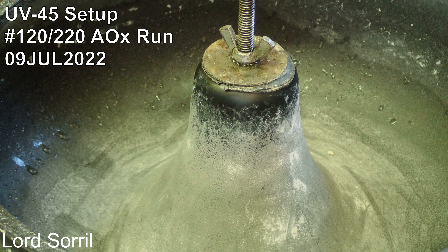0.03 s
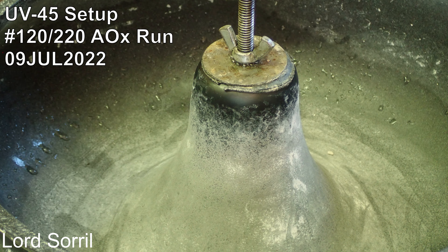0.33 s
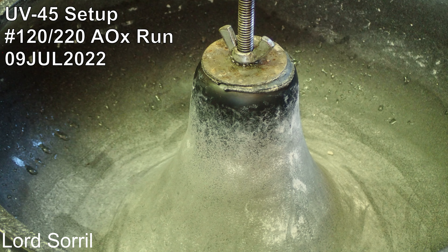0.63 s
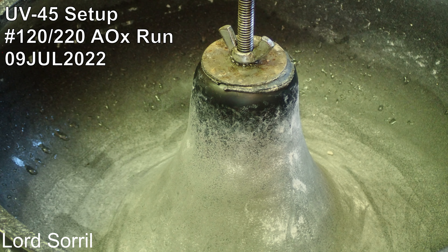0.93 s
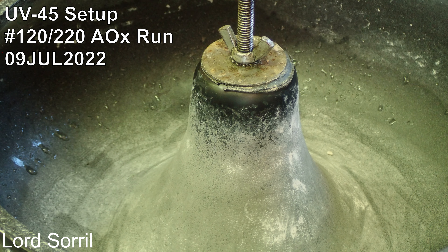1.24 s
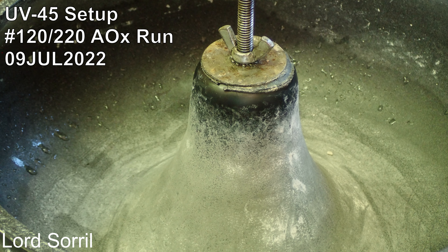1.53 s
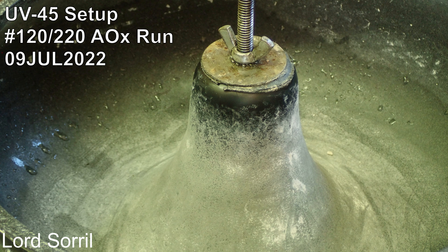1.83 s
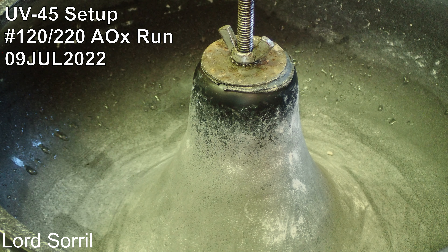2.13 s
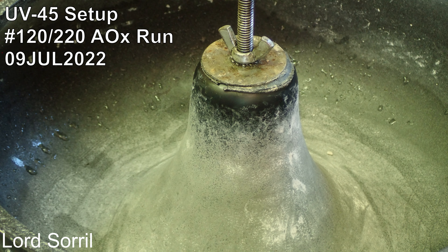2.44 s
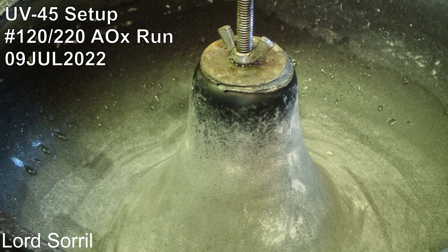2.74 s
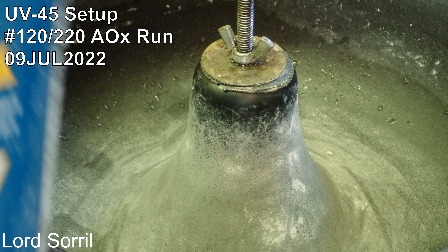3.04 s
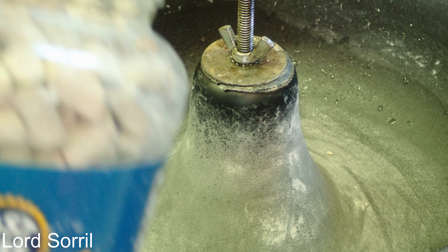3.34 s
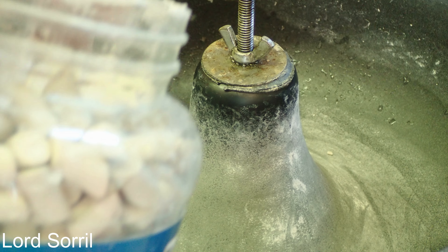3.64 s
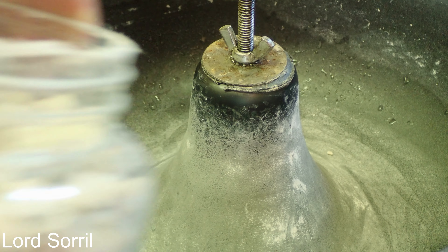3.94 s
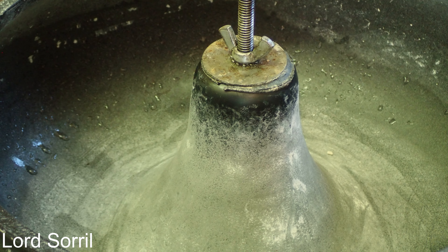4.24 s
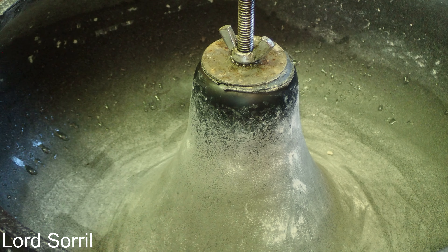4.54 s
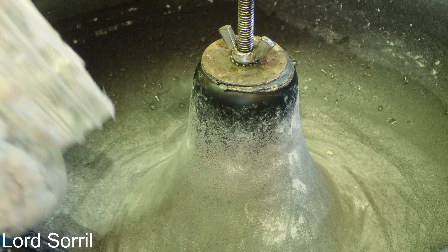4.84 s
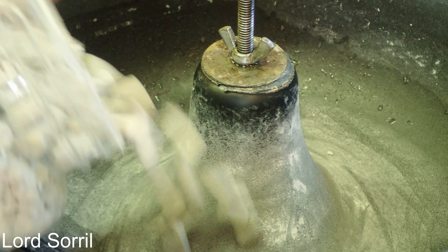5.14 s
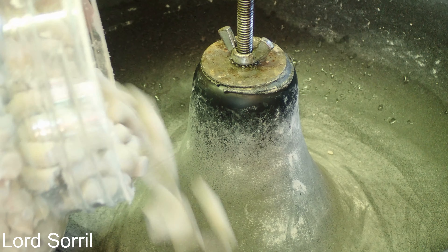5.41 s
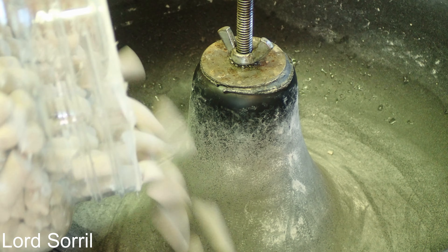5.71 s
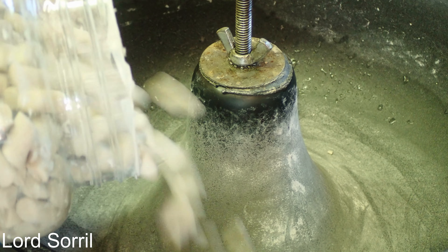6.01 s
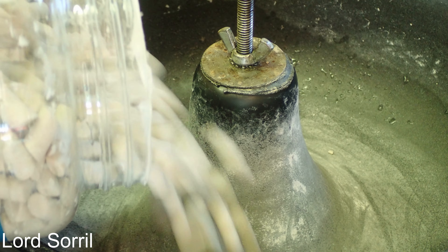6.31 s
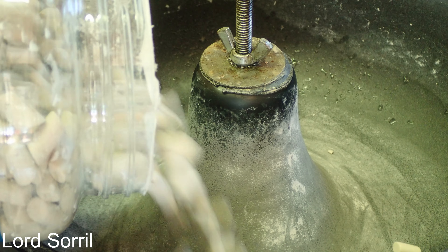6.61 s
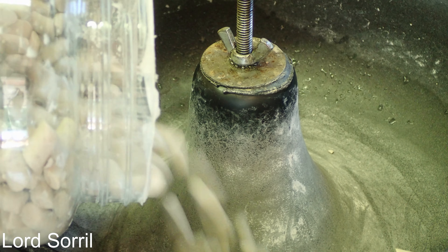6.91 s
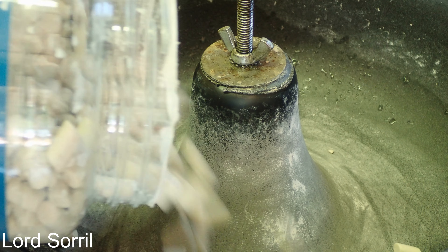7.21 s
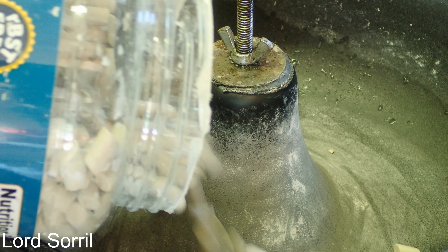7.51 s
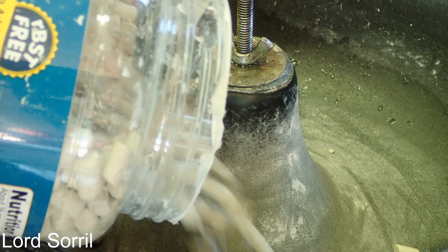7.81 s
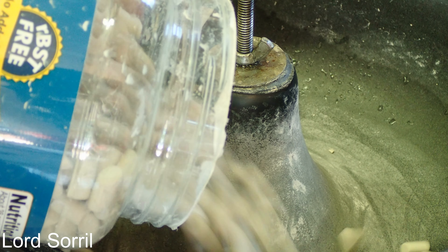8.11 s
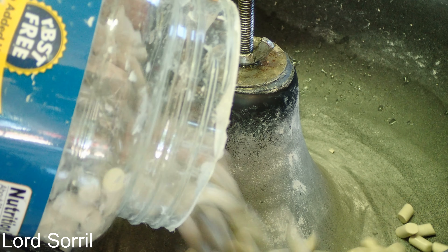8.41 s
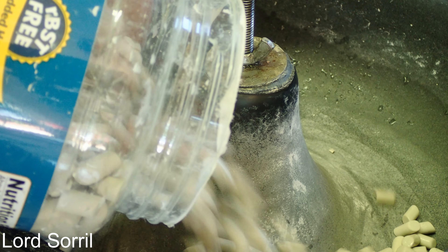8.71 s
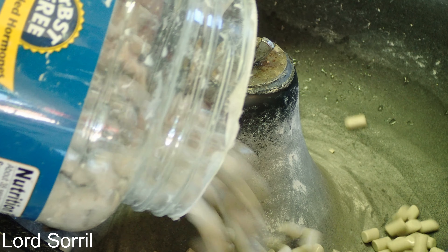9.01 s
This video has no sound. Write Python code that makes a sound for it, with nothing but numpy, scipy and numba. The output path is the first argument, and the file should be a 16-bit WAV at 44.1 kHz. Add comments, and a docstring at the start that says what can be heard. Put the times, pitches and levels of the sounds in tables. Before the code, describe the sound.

Close to the microphone, wet slurry churns in a humming, hissing tumbler while a few ceramic pellets shift and tick inside a plastic jar. Then the jar empties into the bowl: uneven clumps clack and knock against the bare plastic, growing into a denser, brighter clatter of pellet on pellet. The pouring covers the machine's rumble and carries on to the end.

```python
"""A vibratory tumbler runs throughout: its unbalanced motor hums, wet slurry churns, the machine hisses.
First, ceramic pellets slide and click in a plastic jar, each contact radiating a brief transient.
From 4.8 s they pour in, and their impacts excite the modes of the bare bowl. As a heap builds up, it damps
the bowl and cushions the blows into a denser, brighter rush. On the loudest impacts a close camera's
limiter lowers the gain, pulling the machine down under the clatter."""
import sys
import numpy as np
from scipy import signal
from scipy.fft import rfft, irfft, next_fast_len
from scipy.io import wavfile
from scipy.ndimage import uniform_filter1d
from numba import njit

SR = 44100
rng = np.random.default_rng(int(sys.argv[2]) if len(sys.argv) > 2 else 0)


def inscribe(sig):
    """Save sig as 16-bit PCM at rate SR to the path in sys.argv[1].

    A 1-D sig is mono; a 2-D sig holds one channel per row.
    Samples are clipped to [-1, 1] before scaling.
    """
    pcm = np.round(np.clip(np.atleast_2d(sig).T, -1, 1) * 32767)
    wavfile.write(sys.argv[1], SR, pcm.astype(np.int16))


N = 403515
TIME = np.arange(N) / SR
FFT_SIZE = next_fast_len(N + 20000)
FREQ = np.arange(FFT_SIZE // 2 + 1) * SR / FFT_SIZE


def undb(db):
    """Amplitude ratio of a level."""
    return 10 ** (np.asarray(db) / 20)

def unit(x):
    """Normalisation to an rms of 1."""
    return x / np.sqrt(np.mean(np.abs(x) ** 2))

def curves(table):
    """Linear interpolation of each column over time."""
    times, *columns = np.transpose(table)
    return [np.interp(TIME, times, column) for column in columns]

def colour(points):
    """Minimum-phase response of unit power with the given spectral shape."""
    hz, db = np.transpose(points)
    spectrum_db = np.interp(np.log(FREQ + 1), np.log(hz), db)
    cepstrum = irfft(np.log(undb(spectrum_db)), FFT_SIZE)
    cepstrum[FFT_SIZE // 2:] = 0
    return unit(np.exp(2 * rfft(cepstrum)))

def resonances(modes):
    """Superposition of damped modes: (frequency [Hz], bandwidth [Hz], level [dB])."""
    return sum(undb(db) * FREQ * width / (FREQ * width + 1j * (FREQ ** 2 - hz ** 2))
               for hz, width, db in modes)

def filtered(x, response):
    """Convolution as a product of spectra."""
    return irfft(rfft(x, FFT_SIZE) * response, FFT_SIZE)[..., :N]

def stereo_noise(shape, coherence):
    """Partially coherent white noise, left and right."""
    mid, side = rng.standard_normal((2,) + shape)
    mid, side = mid * np.sqrt((1 + coherence) / 2), side * np.sqrt((1 - coherence) / 2)
    return np.array([mid + side, mid - side])

def wander(rate_hz):
    """Smooth random modulation with a spread near 1."""
    hold = int(SR / rate_hz)
    steps = np.repeat(rng.standard_normal(N // hold + 1), hold)
    return 1.3 * uniform_filter1d(uniform_filter1d(steps, hold), hold)[:N]

def contacts(times, sizes, ring_s, coherence, tone=0, tail_db=-17, tail_s=.036, samples=640):
    """Impact transients of energy size squared: damped noise, an optional ring, a spray of reflections."""
    t = np.arange(samples) / SR
    pitch_hz = rng.uniform(4740, 9640, (len(times), 1))
    noise = stereo_noise((len(times), samples), coherence)
    ring = tone * np.sin(2 * np.pi * pitch_hz * t)
    burst = (noise + ring) * np.exp(-t / ring_s) + undb(tail_db) * noise * np.exp(-t / tail_s)
    energy = (burst ** 2).mean(0).sum(1)
    burst *= (sizes / np.sqrt(energy))[:, None]
    index = ((times * SR).astype(int)[:, None] + np.arange(samples)).ravel()
    return np.array([np.bincount(index, side.ravel(), N + samples)[:N] for side in burst])

def shower(per_s, scatter_db):
    """Poisson process: sample indices of contacts, and sizes that give an rms near 1."""
    index = np.flatnonzero(rng.random(N) < per_s / SR)
    sizes = unit(undb(scatter_db * np.clip(rng.standard_normal(N)[index], -2, 2)))
    return index, sizes * np.sqrt(SR / per_s[index])

def reverberant(x, t60_s, wet_db, coherence, samples=16000):
    """Direct sound plus dense reflections that decay exponentially."""
    t = np.arange(samples) / SR
    tail = stereo_noise((samples,), coherence) * undb(-60 * t / t60_s) * (t > .001)
    return x + undb(wet_db) * filtered(x, rfft(unit(tail), FFT_SIZE) / np.sqrt(samples))


# Motor harmonics: (multiple of the shaft rate, level [dB])
HARMONICS = [(1, -59), (2, -45)]

def motor_hum(shaft_angle):
    """Rotating unbalance forces vibration at harmonics of the shaft rate."""
    return sum(np.sqrt(2) * undb(db + 2.1 * wander(8)) * np.sin(k * shaft_angle) for k, db in HARMONICS)

# Strength of the churning: (time [s], rumble level [dB], wash level [dB])
CHURN_LEVELS = [(0.1, -25, -27), (0.35, -27, -27.5), (0.95, -26, -26), (1.35, -25.5, -27.5),
                (1.55, -28, -32), (2.15, -26.5, -27.5), (2.5, -27, -27), (3.6, -27.5, -26.5),
                (4.25, -25.5, -25), (4.5, -27.5, -28.5), (4.75, -28.5, -27.5)]
# Spectra of the bowl's rumble and the slurry's wash: (frequency [Hz], relative level [dB])
RUMBLE_SPECTRUM = [(28, -48), (50, -40), (75, -13.5), (146, -13.5), (269, -1.5), (305, -5.5), (339, -3.5),
                   (408, -5), (448, -3.5), (520, -6), (600, -11), (780, -25.5), (1320, -120)]
WASH_SPECTRUM = [(450, -26.5), (760, -2), (827, -1), (874, 1.5), (946, -1), (1020, 1.5), (1340, 0),
                 (1470, -2), (1550, 1.5), (1670, -3), (2030, -6), (2540, -22), (2900, -22), (3770, -39),
                 (6380, -120)]
# Modes of the loaded bowl: (frequency [Hz], bandwidth [Hz], relative level [dB])
LOADED_MODES = [(202.7, 9.2, -5), (223.3, 5.5, -2), (278.2, 3.8, 1), (353, 45, -6.5)]

def slurry(shaft_angle, throw_depth=.06):
    """Churning is random excitation of the bowl; a throw once a turn amplitude-modulates the wash."""
    rumble_db, wash_db = curves(CHURN_LEVELS)
    throw = unit(1 + throw_depth * (np.sin(shaft_angle) + .7 * np.sin(2 * shaft_angle)))
    bowl = unit(colour(RUMBLE_SPECTRUM) * (1 + resonances(LOADED_MODES)))
    rumble = filtered(stereo_noise((N,), .99), bowl) * undb(rumble_db + 1.24 * wander(14))
    wash = filtered(stereo_noise((N,), .98) * throw, colour(WASH_SPECTRUM))
    return rumble + wash * undb(wash_db + 1.02 * wander(24))

# Machine hiss through the microphone: (frequency [Hz], relative level [dB])
HISS_SPECTRUM = [(1760, -31), (3000, -26), (3220, -22.5), (3520, -10.5), (4350, -11), (4860, -3.5),
                 (5600, 1), (6480, 3), (7720, -8), (8580, -4), (9140, -6.5), (10800, -20), (14000, -14.5),
                 (16000, -31)]

def machine_hiss(level_db=-32.5):
    """Steady noise, coloured by the microphone's treble resonances."""
    return filtered(stereo_noise((N,), .31), colour(HISS_SPECTRUM)) * undb(level_db + 1.4 * wander(18))

# Gulps of the slurry: (time [s], frequency [Hz], peak level [dB])
SLURRY_GULPS = [(0.527, 1570, -23), (0.597, 1570, -25), (1.58, 1560, -27)]

def gulps(half_length_s=.017, warble=.08):
    """Each gulp is a Gaussian tone pulse with random frequency modulation."""
    sound = np.zeros(N)
    for s, hz, db in SLURRY_GULPS:
        phase = 2 * np.pi * np.cumsum(hz * (1 + warble * wander(400))) / SR
        sound += undb(db) * np.exp(-((TIME - s) / half_length_s) ** 2) * np.sin(phase)
    return sound

def draught():
    """Stirred air brushes each microphone port separately, giving incoherent low noise."""
    return undb(-59) * filtered(stereo_noise((N,), 0), unit(resonances([(78, 53, 0)]) ** 2))

def tumbler(shaft_hz=59.64, wobble=.0046):
    """Forced vibration: one slightly unsteady shaft times both the hum and the slurry's throw."""
    shaft_angle = 2 * np.pi * np.cumsum(shaft_hz * (1 + wobble * wander(5.17))) / SR
    return motor_hum(shaft_angle) + slurry(shaft_angle) + machine_hiss() + gulps() + draught()


# Pellet clack through the microphone: (frequency [Hz], relative level [dB])
CLACK_SPECTRUM = [(1880, -56), (3200, -23.5), (4250, -14), (4600, -11), (5300, -3.5), (5710, -5),
                  (6230, 0.5), (6850, -4), (7580, -9.5), (8270, -6.5), (8850, -7), (9340, -10),
                  (10500, -22.5), (14700, -33), (16000, -40)]

def clack(impacts):
    """A bright pellet clack, coloured by the microphone's treble resonances."""
    return filtered(impacts, colour(CLACK_SPECTRUM))

# Tick of two pellet edges: (frequency [Hz], relative level [dB])
EDGE_SPECTRUM = [(7000, -32), (9500, 2), (11000, 24.5), (13000, 12), (14500, 15), (16000, 10), (18000, -56)]

def edge_tick(impacts):
    """The briefest contacts reach the top octave."""
    return filtered(impacts, colour(EDGE_SPECTRUM))

# Slides of the jar's load: (time [s], level [dB], decay time [s], wall scrape re slide [dB])
JAR_SLIDES = [(0.304, -24, 0.095, -9.5), (0.893, -20.5, .04, -25), (0.963, -22, 0.077, -28),
              (1.13, -25.5, 0.05, -17), (1.264, -26, .06, -11), (1.35, -27.5, .06, -11),
              (3.19, -27, 0.045, -10)]
# Single pellets in the jar: (time [s], relative level [dB], top-octave weight [dB])
JAR_CLICKS = [(0.255, -9.5, -30), (0.8999, -6.5, -16), (0.9986, -10, -17), (1.1606, -5, -19),
              (1.3947, -3, -32), (1.501, -10.5, -36), (1.856, -11, -22), (3.1697, -10.5, -9),
              (3.217, -11.5, -22), (3.2914, -12, -11), (3.4864, -12, -9), (3.515, -12, -14),
              (3.6441, -11.5, -10), (4.6666, -15, -10), (4.7432, -10.5, -18), (4.795, -7, -17)]

def jar(slide_contacts_per_s=1100, rise_s=.012):
    """Sliding friction is a train of tiny impacts; scrapes and dull clicks excite the plastic wall."""
    start, slide_db, decay_s, scrape_db = np.transpose(JAR_SLIDES)[..., None]
    index, sizes = shower(slide_contacts_per_s * (TIME < POUR_START_S), scatter_db=2)
    times = index / SR
    age = times - start
    envelope = np.clip(age / rise_s, 0, 1) * np.exp(-np.maximum(age - rise_s, 0) / decay_s)
    sliding = sizes * undb(slide_db) * envelope
    slide = contacts(times, sliding.sum(0), ring_s=.0012, coherence=.15, tone=.35, samples=256)
    scrape = contacts(times, (sliding * undb(scrape_db)).sum(0), ring_s=.0011, coherence=.56, samples=256)
    s, db, top_db = np.transpose(JAR_CLICKS)
    clicks = contacts(s, undb(db + 8.5), ring_s=.0025, coherence=.32, tone=.47)
    edges = contacts(s, undb(db + top_db + 10.5), ring_s=.001, coherence=.3)
    taps = contacts(s, undb(db - top_db - 33), ring_s=.0055, coherence=1)
    wall = filtered(taps + scrape, unit(resonances([(4470, 1700, 0)]) ** 2))
    direct = clack(slide + clicks) + edge_tick(edges + undb(-19) * slide) + wall
    return reverberant(direct, t60_s=.23, wet_db=-12, coherence=.092)


# Spectrum of the bowl's dull knock: (frequency [Hz], relative level [dB])
KNOCK_SPECTRUM = [(420, -37.5), (720, -19.5), (774, -4.5), (822, -8), (1180, -5), (1280, -4.5),
                  (1490, -2.5), (1610, -6), (1760, -1.5), (1910, 0), (2700, -14.5), (3510, -34),
                  (5940, -120)]
# Modes of the bare bowl: (frequency [Hz], bandwidth [Hz], relative level [dB])
BARE_MODES = [(620, 22, 0), (853, 110, -1.5), (995, 93, 6), (1370, 80, 1), (1780, 20, -14)]

def bowl_knocks(force, heap):
    """Loading and damping: the plastic bowl rings less and thuds more as the heap covers it."""
    knock = undb(-3) * filtered(force, colour(KNOCK_SPECTRUM))
    ring = undb(-4.5 - 10 * heap) * filtered(force, unit(resonances(BARE_MODES)))
    thud = undb(-14.5) * heap * filtered(force, unit(resonances(LOADED_MODES[-1:])))
    return reverberant(knock + ring + thud, t60_s=.08, wet_db=-9, coherence=1)

# Sudden hard pellet hits: (time [s], relative level [dB])
HARD_CRACKS = [(4.836, 7), (4.93, -4.5), (5.1962, 0), (7.833, -2)]
# Spectrum of their overload crack: (frequency [Hz], relative level [dB])
CRACK_SPECTRUM = [(100, -5), (350, 1), (2500, -3), (8000, 7.5), (15000, -5)]

def hard_cracks():
    """Overload: sudden hard hits give sharp broadband cracks at the microphone, with a bowl thump."""
    s, db = np.transpose(HARD_CRACKS)
    blows = contacts(s, undb(db), ring_s=.00018, coherence=.74, tail_db=-34, tail_s=.004)
    force = np.bincount((s * SR).astype(int), undb(db), N)
    bowl = undb(-5) * unit(resonances(LOADED_MODES[-1:])) + undb(-6.5) * colour(KNOCK_SPECTRUM)
    return filtered(blows, colour(CRACK_SPECTRUM)) + filtered(force, bowl)

# Clumps landing: (time [s], relative level of first blow [dB], fade time [s], knock weight [dB])
CLUMP_LANDINGS = [(4.835, -4.5, .003, -18), (4.853, -11, .003, -21), (4.887, -8, .004, -25.5),
                  (4.931, -2.5, .004, -21), (4.9595, -2, .004, -27.5), (4.975, -1, .008, -24),
                  (4.99, -2, 0.065, -24), (5.054, -4, .004, -31), (5.1956, 1, .003, -21),
                  (5.217, -4, 0.0029, -34), (5.23, -4, 0.0072, -20), (5.2443, -1, 0.0084, -20),
                  (5.2686, -4, 0.0065, -20), (5.284, -5, 0.023, -17), (5.338, -7.5, .008, -23),
                  (5.353, 0, .004, -20), (5.39, -4, 0.0054, -19), (5.4094, -5.5, .016, -19),
                  (5.433, 1, 0.035, -19.5), (5.48, -4, .008, -22), (5.5145, -2, 0.0049, -22),
                  (5.54, -1, 0.0032, -16), (5.561, 1.5, 0.0087, -16.5), (5.593, -1, .04, -17.5),
                  (5.698, -1, 0.078, -16.5), (5.755, 3.5, 0.0035, -24), (5.794, 0.5, .006, -31),
                  (5.808, -2, 0.01, -20), (5.851, -4, .005, -18), (5.873, -2, 0.02, -10),
                  (5.911, -4.5, 0.0077, -20), (5.948, 0.5, 0.015, -16), (5.982, -1.5, 0.028, -19),
                  (6.048, 0.5, .006, -33), (6.077, -6, 0.09, -17.5), (6.144, -4.5, 0.049, -19),
                  (6.23, -6.5, 0.036, -14.5), (6.304, -0.5, 0.015, -15), (6.349, -3.5, .02, -23.5),
                  (6.423, -3, 0.019, -18), (6.49, -3, .045, -19.5), (6.568, -5, .018, -33),
                  (6.616, -13, .015, -20), (6.793, 1.5, 0.017, -23), (6.87, -1.5, 0.04, -22.5),
                  (6.984, 6, 0.0068, -27), (7.077, 0, 0.0052, -19), (7.117, 4, 0.017, -19.5),
                  (7.168, 5, 0.01, -22), (7.196, 1.5, 0.069, -21.5), (7.319, 4, 0.0044, -22),
                  (7.373, 1, 0.034, -22.5), (7.474, 3, 0.011, -17), (7.637, 7, 0.014, -27),
                  (7.703, 5, .008, -26), (7.771, 6.5, 0.011, -27), (7.835, 6, 0.041, -23.5),
                  (7.972, 8.5, 0.013, -18), (8.763, 9, 0.054, -20.5), (8.973, 0.5, .025, -29)]

def clump_blows(count=9, gap_s=.0095, fade_db=9, spread_db=2.5):
    """Staggered arrivals make a fading run of blows: (time [s], level [dB], knock weight [dB])."""
    s, db, fade_s, knock_db = np.transpose(CLUMP_LANDINGS)[..., None]
    gaps = gap_s * rng.uniform(.5, 1.5, (len(s), count))
    delay = np.cumsum(gaps, 1) - gaps[:, :1]
    scatter_db = spread_db * rng.standard_normal(delay.shape) * (delay > 0)
    blow_db = db + scatter_db - fade_db * (delay / fade_s) ** 2
    return np.array([(s + delay).ravel(), blow_db.ravel(), np.repeat(knock_db, count)])

def stray_blows(flow_db, heap, count=520, bare_per_s=16, heap_per_s=130):
    """Lone pellets arrive at jittered times, as hard as the flow is strong; columns as for clumps."""
    per_s = (bare_per_s * (1 - heap) + heap_per_s * heap) * (TIME > POUR_START_S)
    s = np.interp(np.arange(count) + rng.random(count), np.cumsum(per_s) / SR, TIME)
    blow_scatter, knock_scatter = rng.standard_normal((count, 2)).T
    blow_db = np.interp(s, TIME, flow_db) + 11 + 3 * np.clip(blow_scatter, -2, 2)
    return np.array([s, blow_db, knock_scatter - 22])[:, s < TIME[-1]]

def bounced(times, db, gap_s=.004, loss_db=11, count=2):
    """Inelastic collision: times and sizes of each landing and its weaker rebound."""
    gaps = gap_s * rng.uniform(.24, 1.4, (len(times), count))
    delay = np.cumsum(gaps, 1) - gaps[:, :1]
    return (times[:, None] + delay).ravel(), undb(db[:, None] - loss_db * np.arange(count)).ravel()

def narrowed(x, stereo_from_hz=5100):
    """Long waves reach both ports alike, so left and right differ only in the treble."""
    side = filtered(x[0] - x[1], (1 + (stereo_from_hz / (FREQ + 1)) ** 10) ** -.5) / 2
    return x.mean(0) + np.array([side, -side])

# The falling stream: (time [s], flow level [dB], gain from the fall [dB], share on the heap [0-1])
STREAM = [(4.8, -42.5, 12, .25), (4.9, -28.5, 11.5, .2), (5.0, -19.5, 15.5, .15), (5.18, -28.5, 12, .06),
          (5.3, -21.5, 15.5, .05), (5.8, -20, 15.5, .1), (6.65, -20, 19.5, .4), (7.05, -18.5, 11.5, .55),
          (7.55, -17.5, 9, .7), (8.15, -10.5, 11, .85), (8.7, -16.5, 11, .95), (9.15, -17.5, 10.5, .95)]
POUR_START_S = STREAM[0][0]
# Jams in the jar's neck: (time [s], duration [s])
NECK_JAMS = [(5.754, 0.026), (6.177, 0.054), (7.783, .054)]

def pour(jam_db=-7, cushion_db=4.5, bare_per_s=700, heap_per_s=2800):
    """Superposed impacts: hard blows amid a fine shower fuse into a rush as the heap cushions them."""
    flow_db, fall_db, heap = curves(STREAM)
    flow_db += jam_db * sum((TIME > s) & (TIME < s + length_s) for s, length_s in NECK_JAMS)
    s, db, knock_db = np.hstack([clump_blows(), stray_blows(flow_db, heap)])
    blow_db = db + 11.5 - cushion_db * np.interp(s, TIME, heap)
    hard = contacts(*bounced(s, blow_db), ring_s=.0017, coherence=.68, tone=.69, tail_db=-15)
    per_s = (bare_per_s * (1 - heap) + heap_per_s * heap) * (TIME > POUR_START_S)
    index, sizes = shower(per_s, scatter_db=2.5)
    sizes *= undb(flow_db - 4 + 1.5 * heap + wander(70))[index]  # the shower comes in little surges
    fine = contacts(index / SR, sizes, ring_s=.0018, coherence=.68, tone=.48, samples=256)
    impacts = hard + fine
    # ceramic on ceramic is a shorter, brighter contact than ceramic on plastic
    clatter = clack(impacts) + undb(-14) * heap * edge_tick(impacts) + hard_cracks()
    # the same blows drive the bowl
    force = contacts(index / SR, sizes * undb(-10.5), ring_s=.0007, coherence=1, samples=256)
    force += contacts(s, undb(db + knock_db + 19), ring_s=.0062, coherence=1, tail_db=2, tail_s=.0066)
    clatter = narrowed(reverberant(clatter, t60_s=.04, wet_db=-7, coherence=.16))
    return (clatter + bowl_knocks(force, heap)) * undb(fall_db)

def scene():
    """Sound pressures add linearly."""
    return tumbler() + jar() + pour()


@njit
def peak_envelope(x, attack, release):
    """Envelope detection with separate rates of rise and fall."""
    envelope, held = np.empty(len(x)), 0.
    for i in range(len(x)):
        held += (x[i] - held) * (attack if x[i] > held else release)
        envelope[i] = held
    return envelope

def limiter(x, ceiling, attack_s, release_s):
    """Gain reduction: both channels are turned down while the envelope exceeds the ceiling."""
    peak = peak_envelope(np.abs(x).max(0), 1 - np.exp(-1 / (attack_s * SR)), 1 / (release_s * SR))
    return x / np.maximum(peak / ceiling, 1)

# Left microphone port relative to right: (frequency [Hz], level difference [dB], phase lead [rad])
PORT_DIFFERENCES = [(100, -1, 0.093), (1210, -0.35, 0.051), (3700, -1, 0.42), (4400, 0.5, -0.82),
                    (4560, -14, 0.51), (5180, -3, 0.98), (6800, 7, 0.46), (6840, 7.5, 0.54),
                    (8100, -0.3, -0.23), (12000, 3, -0.85), (15000, 0.0, -1)]

def record(dry, start_s=.086, cutoff_hz=15800):
    """The camera switches on, then applies port responses, limiting, soft saturation and a low-pass."""
    hz, balance_db, lead = np.transpose(PORT_DIFFERENCES)
    port = undb(np.interp(FREQ, hz, balance_db) / 2) * np.exp(.5j * np.interp(FREQ, hz, lead))
    ported = filtered(dry, np.array([port, 1 / port])) * (TIME > start_s)
    limited = limiter(ported, ceiling=.79, attack_s=.00018, release_s=.11)
    saturated = limited / (1 + limited ** 6) ** (1 / 6)
    return signal.sosfilt(signal.ellip(8, .2, 70, cutoff_hz, fs=SR, output="sos"), saturated)


dry = scene()
out = record(dry)
inscribe(out)
```